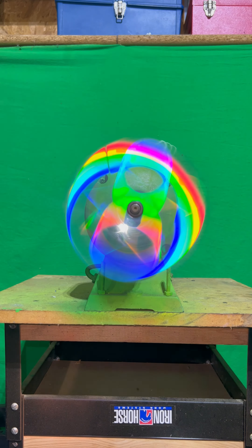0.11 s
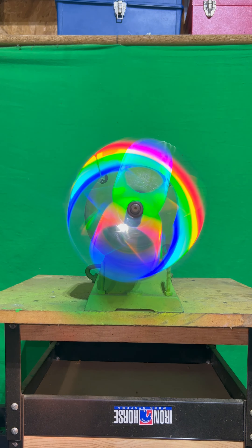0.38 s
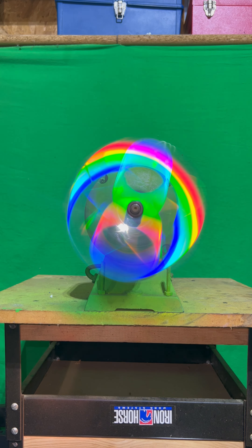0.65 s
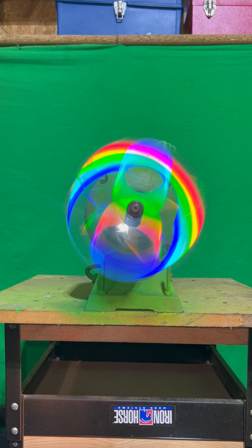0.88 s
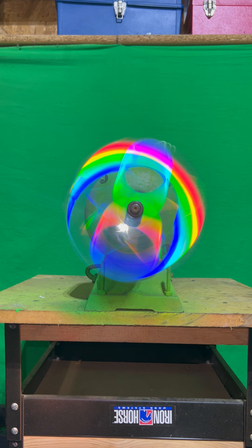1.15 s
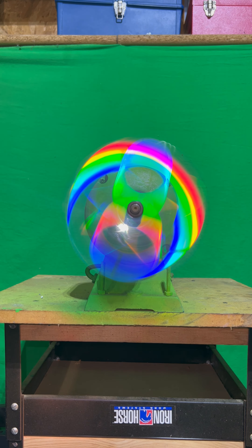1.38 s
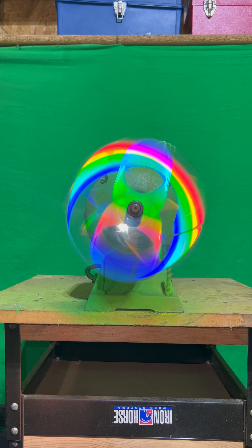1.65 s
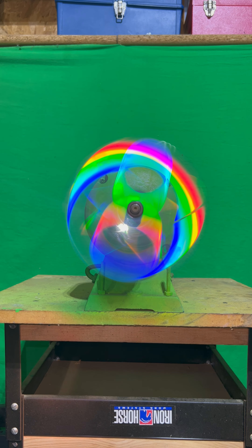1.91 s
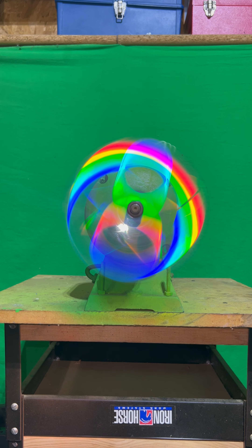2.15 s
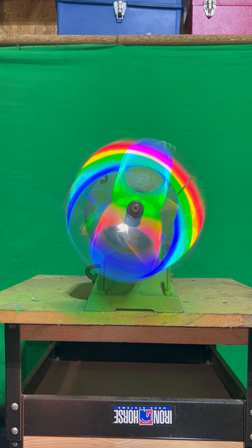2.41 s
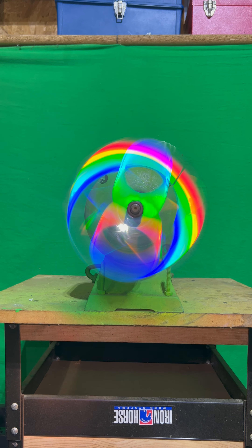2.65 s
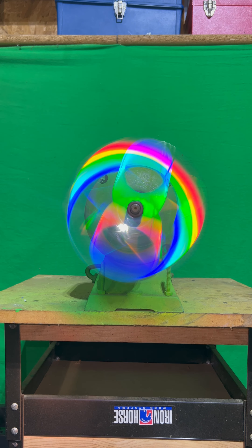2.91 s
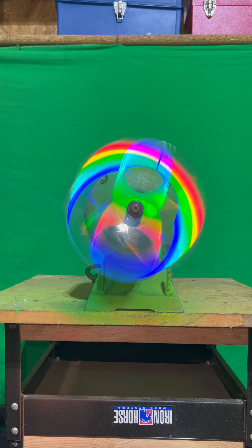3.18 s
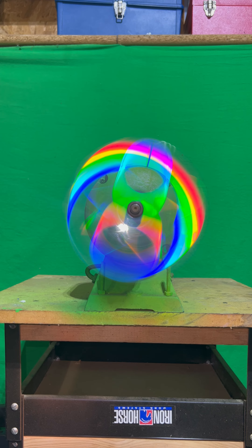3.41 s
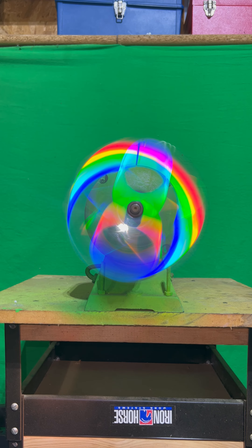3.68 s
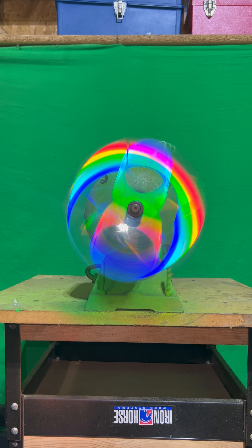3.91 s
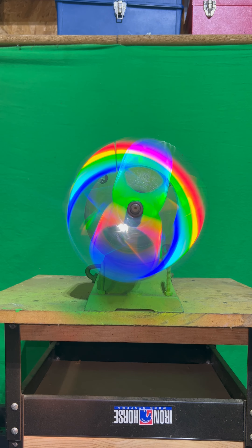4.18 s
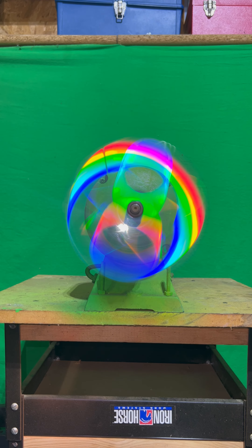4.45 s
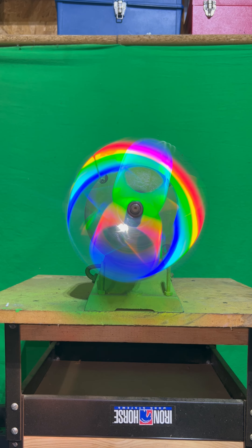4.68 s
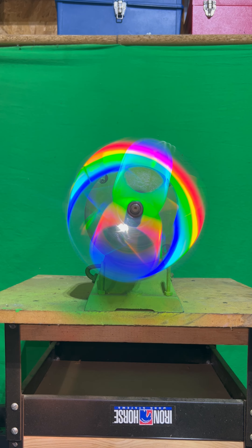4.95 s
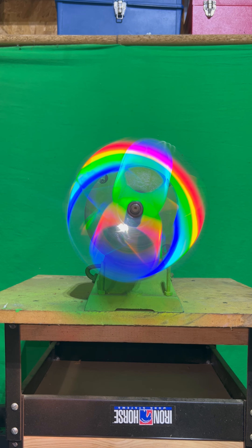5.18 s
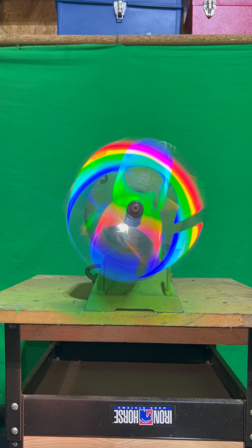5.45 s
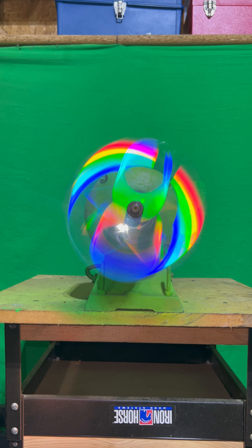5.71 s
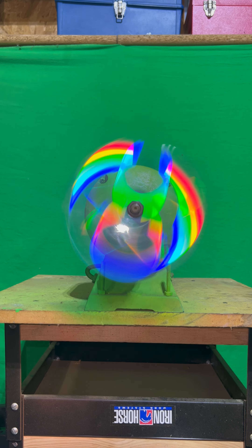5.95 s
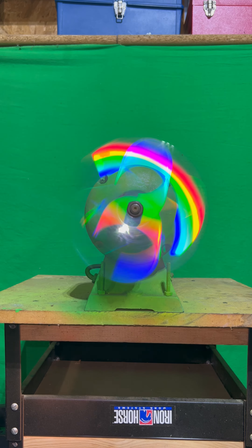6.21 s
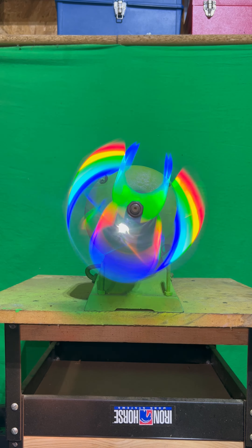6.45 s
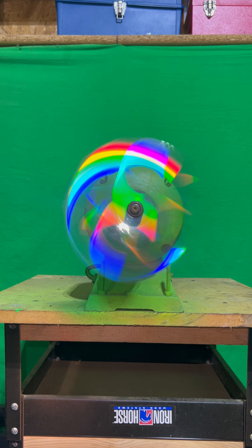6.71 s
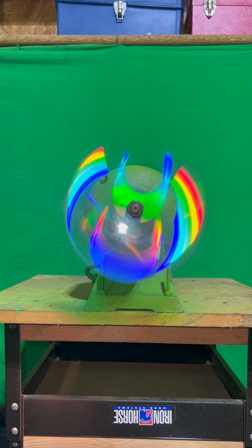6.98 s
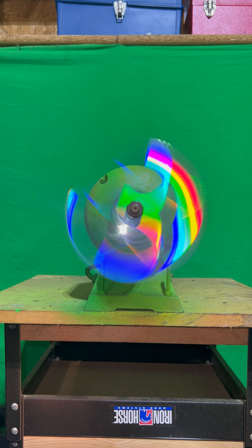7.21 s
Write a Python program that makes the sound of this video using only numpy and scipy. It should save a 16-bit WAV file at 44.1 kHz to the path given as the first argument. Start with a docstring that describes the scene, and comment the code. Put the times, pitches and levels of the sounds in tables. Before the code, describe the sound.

A bench grinder carrying an unbalanced load runs on a wooden bench in a workshop, heard close in stereo. From 0 to 0.6 seconds it is loudest and loosest: a rough bright rattle rising to speed, with two sharp metal ticks in the first tenth of a second and a fast wobble. The rattle eases and by about 1.5 seconds it is a steady, gritty low buzz, near sixty knocks a second, woody and slightly hollow, with low hum, faint ringing bearings and soft air beneath. This holds nearly unchanged until about 5.4, when it is switched off. Loose chatter returns as the pitch sinks, brightening around 5.9 with another tick. Between 6.1 and 6.5 the knocking collapses into a short low tail. A thin whine near 1200 hertz then glides downward and fades over quiet bearing hiss and air, with a faint low bench swell around 7.2.

```python
"""A bench grinder with an unbalanced load climbs the last step to speed amid loose rattling and metal ticks.
Its speed swings, then settles into a steady buzz: one knock a turn, coloured by the wooden bench and the room
differently at two microphone ports, over low hum, ringing bearings and soft air. Switched off, it rattles again
and slows under air drag; the knocking falls to a short low tail, then a thin falling tone and a low bench
swell pass over the bearings and air."""
import sys
import numpy as np
from scipy import signal
from scipy.fft import rfft, irfft, next_fast_len
from scipy.io import wavfile
from scipy.ndimage import uniform_filter1d

SR = 44100
rng = np.random.default_rng(int(sys.argv[2]) if len(sys.argv) > 2 else 0)


def attenuation_scalar(level_db):
    """Turn a level in dB into a linear amplitude multiplier (20 dB per decade)."""
    decades = np.asarray(level_db, float) / 20
    return 10 ** decades


def transcribe(u):
    """Save the signal u as a 16-bit wav file named by the first command-line argument.

    u: samples, shape (n,) or (channels, n), limited to [-1, 1]; the rate is SR.
    q: integer samples, one column per channel.
    """
    v = np.clip(np.atleast_2d(u).T, -1, 1)
    q = np.round(v * 32767).astype(np.int16)
    wavfile.write(sys.argv[1], SR, q)


N = 324135
T = np.arange(N) / SR  # time [s]
RUNNING_HZ = 59.775  # settled speed, turns per s
SWITCH_OFF = 5.37  # s
# level of the buzz, which the once-a-turn hum follows: (time [s], level [dB])
BUZZ_LEVEL = [(0, -25), (.025, -17), (.09, -15.5), (.15, -18.5), (.535, -18.5), (.6, -22), (1.55, -25.5),
              (2.75, -25), (5.36, -25), (5.47, -24.5), (5.64, -25.5), (5.9, -24), (6.1, -27.5),
              (6.2, -42.5), (6.3, -53.5), (6.45, -57), (6.55, -75), (7.35, -71)]
# phase lead of the left port in the high treble: (frequency [Hz], lead [rad])
HIGH_LEAD = [(7400, 0), (8900, -.2), (9700, -3.14), (10400, -3.14), (12000, -6.28), (12500, -6.28),
             (13000, -5.5)]


def evened(x):
    """Scales to rms 1."""
    return x / np.sqrt(np.mean(x ** 2) + 1e-20)


def read(points, hz):
    """Reads a spectrum on a log frequency axis."""
    f, value = np.transpose(points)
    return np.interp(np.log(hz + 1), np.log(f + 1), value)


def curves(rows):
    """Draws each column after the time as an automation curve, one value per sample."""
    s, *columns = np.transpose(rows)
    return [np.interp(T, s, c) for c in columns]


def shaped(x, gain):
    """Filters by a gain given as a function of Hz."""
    size = next_fast_len(N + 8192)
    spectrum = rfft(x, size) * gain(np.fft.rfftfreq(size, 1 / SR))
    return irfft(spectrum, size)[..., :N]


def slow(hz):
    """Smooth random drift up to about hz, rms 1."""
    return evened(shaped(rng.standard_normal(N), lambda f: np.exp(-(f / hz) ** 2)))


def bump(at, half):
    """A smooth swell, 1 at its centre."""
    return np.exp(-((T - at) / half) ** 2)


def sides(value):
    """Plus value for the left port, minus value for the right."""
    return np.array([[value], [-value]])


def ports(hz, lead):
    """Splits a phase lead evenly between the ports; high treble takes its lead from the table."""
    lead = np.where(hz > HIGH_LEAD[0][0], read(HIGH_LEAD, hz), lead)
    return np.exp(.5j * np.array([lead, -lead]))


def room(hz, db, rad):
    """A two-port gain read from levels and phases on a grid."""
    def gain(f):
        return np.array([attenuation_scalar(np.interp(f, hz, level, right=-120)) * np.exp(1j * np.interp(f, hz, phase))
                         for level, phase in zip(db, rad)])
    return gain


def crossover(lo, hi):
    """One band of a set that sums to 1."""
    return lambda f: 1 / (1 + (lo / (f + 1)) ** 12) - 1 / (1 + (hi / (f + 1)) ** 12)


def comb(turns, count=216):
    """One sharp pulse a turn: equal multiples up to count, without the two lowest."""
    angle = 2 * np.pi * turns
    pulses = np.sin((count + .5) * angle) / (2 * np.sin(angle / 2) + 1e-12) - .5
    return pulses - np.cos(angle) - np.cos(2 * angle)


def shaft():
    """Turns made so far, and the decaying swing of the speed; drag slows the coast as 1 / (1 + drag x time)."""
    swings_per_s, depth, decay, first_peak = 9.4, 0.52, 0.76, .2  # depth in turns per s, then s, s
    missing, missing_decay = 4.5, .07  # turns per s short at first, s
    drag = .335  # per s
    swing = np.exp(-T / decay) * np.cos(2 * np.pi * swings_per_s * (T - first_peak))
    running = RUNNING_HZ - missing * np.exp(-T / missing_decay) + depth * swing + 0.0116 * slow(2.45)
    speed = running / (1 + drag * np.maximum(T - SWITCH_OFF, 0))
    return np.cumsum(speed) / SR, swing


def looseness(swing):
    """How far the knocking has left its settled pattern, 0-1: high at first, lost in two stages, back on coasting."""
    first, decay, throb = 1, 0.54, 0.14  # share, s, beat with the speed swing
    quick, quick_at, quick_over = 0.25, 0.15, 0.041  # share lost quickly, s, s
    coast, rise = 0.9, 0.12  # share after switch-off, s
    lingering = (first - quick) * np.exp(-T / decay) * (1 + throb * swing)
    brief = quick / (1 + np.exp(np.minimum((T - quick_at) / quick_over, 50)))
    coasting = coast * np.clip((T - SWITCH_OFF + rise / 4) / rise, 0, 1)
    return np.clip(lingering + brief + coasting, 0, .99)


def ringing(hz):
    """Broad bench colour and resonant modes added in power, in relative dB."""
    # broad colour of the loose rattle: (frequency [Hz], relative level [dB])
    bench = [(100, -11), (160, -28), (240, -46), (420, -7.5), (900, -31.5), (1500, -18), (2300, -21.5),
             (4200, -34.5), (8700, -39), (11600, -39.5), (12400, -56), (13000, -54)]
    # bench and housing modes: (frequency [Hz], width [Hz], relative level [dB])
    modes = [(172, 21, -9.5), (231.4, 24, 2), (253.4, 26, 3), (315.7, 25, 5.5), (414, 59, 0),
             (465, 40, -3.5), (510, 35, 4.5), (587, 53, 4), (691, 45, -1.5), (789, 32, 1), (849, 35, -1.5),
             (983, 35, -3), (1110, 27, -7), (1196, 35, -7.5), (1250, 44, -5), (1376, 18, -8.5),
             (1697, 77, -10), (2610, 60, -20), (5960, 110, -30)]
    power = attenuation_scalar(read(bench, hz)) ** 2
    for at, width, db in modes:
        power = power + attenuation_scalar(db) ** 2 / (1 + (2 * (hz - at) / width) ** 2) ** 2
    return 10 * np.log10(power)


def shaken(dips_db=1.5, apart_rad=1.0, step_hz=25, count=530):
    """Gain for loose blows: the ringing of the bench with the room's narrow, random peaks and dips."""
    hz = step_hz * np.arange(1, count + 1)
    chance = rng.standard_normal((count, 3)).T
    chance[1] = np.where(hz > HIGH_LEAD[0][0], chance[0], chance[1])  # high treble is alike at both ports
    db = ringing(hz) + dips_db * chance[:2] - sides(.5)
    travel = np.cumsum(rng.uniform(-1.4, 1.4, count))
    phase = np.unwrap(np.angle(ports(hz, apart_rad * chance[2]))) + travel
    return room(hz, db, phase)


def settled(scatter_db=4, count=220):
    """Gain of bench and room for the settled knock, and its smooth outline; above the table, detail is chance."""
    # bench and room at each multiple of the running speed, relative levels:
    # (left level [dB], right level [dB], left lead [rad])
    response = [(-41, -44, -0.1), (-52, -54, -2.7), (-48, -45, 0.7), (-27, -26, -0.4), (-46, -36, -2.5),
                (-28, -32, -0.7), (-50, -38, 0.1), (-37, -32, -1.6), (-38, -34, 1.9), (-36, -36, -1.5),
                (-27, -40, -1.1), (-31, -30, -1.3), (-33, -29, -1.4), (-45, -40, -1.5), (-39, -35, -0.8),
                (-38, -32, -2.2), (-34, -31, -1.4), (-56, -41, 1.9), (-38, -35, -0.7), (-35, -35, -1.3),
                (-43, -36, -0.3), (-46, -37, -2.3), (-37, -35, -1.5), (-37, -41, -0.7), (-41, -36, 2.5),
                (-38, -36, 2.8), (-38, -32, -0.7), (-41, -39, -2.3), (-44, -40, -0.5), (-44, -43, -2.3),
                (-46, -40, -1.2), (-54, -47, 0.5), (-45, -43, -1.1), (-50, -45, -0.9), (-45, -40, -0.4),
                (-54, -54, 0.1), (-62, -58, -0.2), (-57, -55, 0.6), (-56, -53, -0.2), (-49, -56, 0.8),
                (-49, -47, -0.2), (-63, -57, 2.4), (-48, -42, -0.7), (-44, -42, -0.6), (-49, -48, -2.6),
                (-53, -51, -0.9), (-52, -51, -0.0), (-53, -54, -0.5), (-47, -52, 1.3), (-53, -49, 2.3),
                (-50, -44, 2.0), (-55, -55, 0.1), (-52, -50, 0.8), (-52, -57, 1.0), (-54, -57, 1.9),
                (-52, -51, 0.3), (-56, -53, -0.2), (-55, -59, -2.4), (-52, -52, -0.0), (-67, -64, 3.0),
                (-61, -62, -0.2), (-58, -61, -0.8), (-54, -58, 1.2), (-56, -61, 0.4), (-56, -58, 1.1),
                (-59, -56, 1.8)]
    # mean level of the multiples above those: (frequency [Hz], relative level [dB])
    treble = [(4000, -60), (5000, -63), (5900, -61.5), (6800, -63), (8300, -64), (10400, -63),
              (11400, -71.5), (11510, -71), (11620, -77.5), (12300, -78), (12600, -88), (13000, -100)]
    known = len(response)
    hz = RUNNING_HZ * np.arange(1, count + 1)
    chance = rng.standard_normal((count, 3))
    left = read(treble, hz) + scatter_db * chance[:, 0]
    right = left + np.interp(hz, [7000, 9000], [3.5, .5]) * chance[:, 1] - np.interp(hz, [7000, 9000], [3, 0])
    lead = 2 * chance[:, 2]
    left[:known], right[:known], lead[:known] = np.transpose(response)
    steps = rng.uniform(-2.7, 2.7, count)  # echoes spread each knock over the turn
    # the knock arrives soonest near the tenth multiple, later above and below
    steps[:26] = 2.5 - .75 * np.abs(np.arange(26) - 9.3)
    phase = np.unwrap(np.angle(ports(hz, lead))) + np.cumsum(steps)
    outline = uniform_filter1d(np.array([left, right]), size=7)
    return room(hz, (left, right), phase), room(hz, outline, phase)


def restless(knocks, exact, swing):
    """Lines near a dip or peak of the bench change; this is what they add to or take from the settled knock."""
    # (multiple of running speed [count], early lift [share], speed swing [share],
    #  first wander [share], second wander [share])
    lines = [(5, .3, 1.2, 0, -.6), (7, 0, .5, 0, 0), (8, .2, 1.1, .3, -.4), (9, -.2, 1.7, 0, 1),
             (10, 1.0, .8, -.4, .4), (11, .3, -.4, 1, 0), (12, 0, -.2, 0, 0), (14, .5, 1.1, 0, .4),
             (16, .3, .6, 0, 0), (18, 3.5, 1.6, -.6, 0), (20, .3, .4, 0, 0), (21, .4, .5, 0, 0),
             (22, .4, 1.7, -.4, .3), (23, .3, .4, 0, 0)]
    # two slow wanders of those lines: (time [s], first wander [share], second wander [share])
    wander = [(0, 0, 0), (1.1, .2, -.3), (1.6, -.25, -.55), (1.95, -.36, .12), (2.3, -.3, .25),
              (2.7, .05, .1), (3.0, .1, .12), (3.25, .17, -.38), (3.8, .08, -.1), (4.2, .07, -.1),
              (4.55, .1, .33), (4.9, .13, -.3), (5.4, .18, -.3)]
    decay, lag = 0.63, 0.023  # of the early lift, behind the speed swing, s
    controls = (np.exp(-T / decay), np.interp(T - lag, T, swing), *curves(wander))
    order, *shares = np.transpose(lines)
    out = 0
    for control, share in zip(controls, shares):
        weight = np.bincount(order.astype(int), share, minlength=30)
        moving = shaped(knocks, lambda f: exact(f) * np.interp(f / RUNNING_HZ, np.arange(30), weight))
        out = out + control * moving
    return out


def gritty(turns, knocks, gate=0.72, apart=0.91):
    """Friction noise swelling once a turn: one part shared by the ports, one part each port's own."""
    # noise against the knocks, before bench and room: (frequency [Hz], relative level [dB])
    grit_colour = [(100, -24), (400, -20), (1000, -15.5), (2500, -9.5), (4000, -9), (7000, -9), (12000, 9)]
    shared, own = rng.standard_normal(N), rng.standard_normal((2, N))
    swell = np.std(knocks) * (1 + gate * np.cos(2 * np.pi * turns))

    def near(f):
        return attenuation_scalar(read(grit_colour, f))

    def unalike(f):
        return near(f) * np.interp(f, [3020, 4660, 8200, 8900, 10500, 12500], [apart, 2, 1.2, .03, .1, .5])

    return shaped(shared * swell, near) + shaped(own * swell, unalike)


def low_tail():
    """Level of the lingering rattle: a steep uneven fall onto a quiet rest level."""
    start, tail_db, fall, rest_db = 6.15, -46, 40, -68.5  # s, dB, dB per s, dB; before the band shares
    falling = attenuation_scalar(tail_db - fall * np.abs(T - start) + 4.7 * slow(13))
    return (falling + attenuation_scalar(rest_db)) * np.clip((T - start) * 20, 0, 1)


def buzz(turns, swing, uneven_db=0.49, loose_db=-1, linger_db=17, bounce=0.8):
    """One knock a turn plus grit; when loose, each knock has a bounce at a drifting place in the turn."""
    # bass, middle, upper middle, treble
    splits_hz = (450, 1000, 3600)
    settled_db, rattling_db = (0, -1, -2, -17), (-2, 1, -9, -23.5)  # against the buzz level
    chatter_share = (0, 0.12, 0.36, 1)  # share of the chatter lift
    tail_share_db = (0.5, -11.5, -39, -40)
    # spells of harder, brighter rattling: (half length [s], treble lift [dB])
    chatter = [(0.94, 8), (0.077, 6), (0.15, 11)]
    chatter_s = (.25, 5.42, 5.92)  # centres of the spells
    sway_db, sway_late = -11, .3  # second knock that comes and goes with the speed swing: dB, turns

    loose = looseness(swing)
    turns = turns + (0.00012 + 0.0034 * loose) * slow(33.5)  # timing scatter in turns
    strength_db = uneven_db * (0.5 + 3.3 * loose) * rng.standard_normal(500)[np.round(turns).astype(int)]
    knocks = comb(turns) * attenuation_scalar(strength_db)
    bounces = comb(turns + .4 + 0.0206 * slow(5.1) + 0.0822 * swing)
    bounces = shaped(bounces, lambda f: f ** 4 / (f ** 4 + 650 ** 4))  # light, without bass
    grit = gritty(turns, knocks)

    exact, outline = settled()
    second = attenuation_scalar(sway_db) * swing * comb(turns - sway_late)
    steady = shaped(knocks, exact) + restless(knocks, exact, swing) + shaped(grit + second, outline)
    loosened = shaken()
    rattle = shaped(knocks + bounce * bounces + attenuation_scalar(loose_db) * grit, loosened)
    rumble = rattle + shaped(attenuation_scalar(linger_db) * grit, loosened)

    level = attenuation_scalar(curves(BUZZ_LEVEL)[0])
    lift_db = sum(db * bump(at, half) for at, (half, db) in zip(chatter_s, chatter))
    tail = low_tail()
    edges = (0, *splits_hz, SR)
    bands = zip(edges, edges[1:], settled_db, rattling_db, chatter_share, tail_share_db)
    out = np.zeros((2, N))
    for lo, hi, firm_db, rattle_db, share, tail_db in bands:
        split = crossover(lo, hi)
        parts = [shaped(part, split) for part in (steady, rattle, rumble)]
        firm, rough, low = [part / np.std(part.mean(0)) for part in parts]
        # equal-power crossfade between settled and loose
        out += level * attenuation_scalar(firm_db) * np.sqrt(1 - loose ** 2) * firm
        out += level * attenuation_scalar(rattle_db + share * lift_db) * loose * rough
        out += tail * attenuation_scalar(tail_db) * low
    return out


def hum(turns, swing):
    """The whole bench rocks once and twice a turn, the second hum throbbing with the swing; a low mode swells late."""
    # twice-a-turn hum, before the throb and port balance: (time [s], level [dB])
    twice_level = [(0, -37), (.1, -41), (.27, -52), (.56, -49), (1.25, -56), (1.45, -67), (5.3, -65),
                   (5.42, -51), (5.7, -39), (6.1, -48), (6.26, -56), (6.82, -62), (6.9, -80)]
    below_db, rise, lost = -17, .06, 11  # once a turn: dB against the buzz, s, dB lost per s of coasting
    rock_hz, rock_at, rock_half, rock_db = 77.3, 7.2, .17, -48  # bench mode: Hz, peak s, half length s, dB
    once_db = curves(BUZZ_LEVEL)[0] + below_db - lost * np.maximum(T - SWITCH_OFF, 0)
    once = np.minimum(T / rise, 1) * attenuation_scalar(once_db + sides(1.3)) * np.sin(2 * np.pi * turns + sides(.15))
    twice = attenuation_scalar(curves(twice_level)[0]) * (1 - 1.1 * swing) * np.sin(4 * np.pi * turns + sides(.4))
    rock = attenuation_scalar(rock_db) * bump(rock_at, rock_half) * np.sin(2 * np.pi * rock_hz * T + sides(.4))
    return np.sqrt(2) * (once + attenuation_scalar(sides(.6)) * (twice + rock))


def bearings(turns, throb=0.21):
    """Rolling noise rings the metal modes, swelling once a turn."""
    # metal modes: (frequency [Hz], width [Hz], level [dB])
    metal = [(1670, 70, -68), (2480, 100, -68), (3020, 63, -66), (3368, 58, -56), (4260, 130, -68),
             (4790, 260, -56.5), (7900, 230, -65), (8410, 40, -67), (10920, 390, -60.5)]
    out = np.zeros((2, N))
    for hz, width, db in metal:
        swell = 1 + throb * np.cos(2 * np.pi * (turns + rng.random()))
        lead = rng.uniform(-3.6, 1.7)
        rolling = rng.standard_normal(N) * swell
        ring = shaped(rolling, lambda f: ports(f, lead) / (1 + (2 * (f - hz) / width) ** 2))
        out += attenuation_scalar(db) * evened(ring)
    return out


def air(apart=1.6):
    """Soft rush of the spinning load and the room; below the high treble the ports hear it partly unalike."""
    # colour of the rush: (frequency [Hz], relative level [dB])
    rush = [(24, -33), (40, -6), (86, -5), (520, -20), (615, -5), (745, -21), (969, -11), (2780, -20),
            (3370, -15), (5580, -28.5), (8590, -10), (12200, -21), (12600, -60), (14300, -60), (15200, -11),
            (15900, -70), (22000, -120)]
    noise = rng.standard_normal((3, N))
    alike = shaped(noise[0], lambda f: ports(f, 0) * attenuation_scalar(read(rush, f)))
    unalike = shaped(noise[1:], lambda f: apart * attenuation_scalar(read(rush, f)) * (f < HIGH_LEAD[0][0]))
    return attenuation_scalar(-53) * evened(alike + unalike)


def snaps():
    """Sharp ticks of metal on metal: wideband noise bursts with a fast decay, thinned of bass."""
    # ticks: (time [s], level before filtering [dB])
    ticks = [(0.035, -23), (0.1057, -25), (5.967, -28)]
    out = np.zeros(N)
    for s, db in ticks:
        burst = rng.standard_normal(400) * np.exp(-np.arange(400) / SR / 0.0051)
        out[round(s * SR):][:400] += attenuation_scalar(db) * burst
    return shaped(out, lambda f: f / (f + 3000) / (1 + (f / 13000) ** 16))


def whine():
    """A thin, slightly unsteady tone that falls in pitch and level during the coast."""
    start, start_hz, slowing = 6.22, 1215, .29  # s, Hz, per s
    db, fall = -56, 5.7  # dB, dB per s
    since = np.maximum(T - start, 0)
    level = np.sqrt(2) * attenuation_scalar(db - fall * since + 1.3 * slow(8.6))
    hz = start_hz / (1 + slowing * since) + 4 * slow(31.5)
    tone = level * np.sin(2 * np.pi * np.cumsum(hz) / SR)
    return tone * np.clip(since / 0.046, 0, 1) * attenuation_scalar(sides(.6))


def scene():
    """All sources at both ports, driven by one shaft."""
    turns, swing = shaft()
    return buzz(turns, swing) + hum(turns, swing) + bearings(turns) + air() + snaps() + whine()


def top_cut(x):
    """Nothing passes above the cut-off."""
    return signal.sosfilt(signal.butter(12, 17080, fs=SR, output="sos"), x)


def record(dry):
    """Takes the mix of both ports to its finished form."""
    return top_cut(dry)


dry = scene()
out = record(dry)
transcribe(out)
```